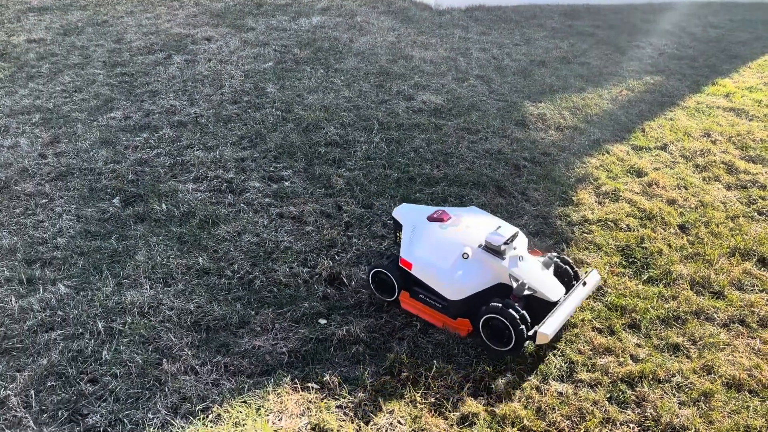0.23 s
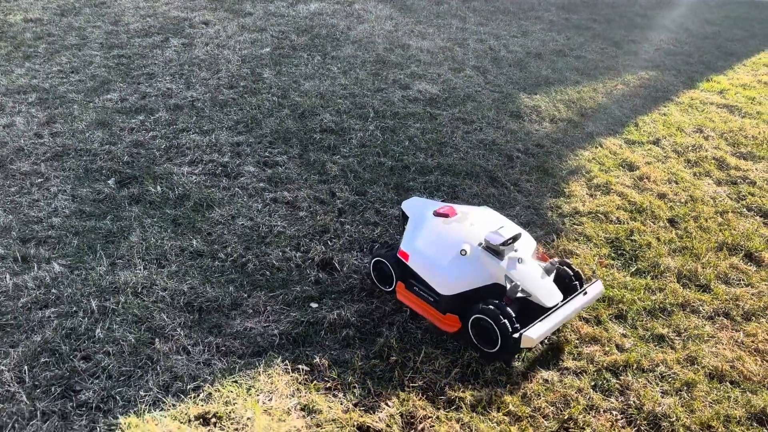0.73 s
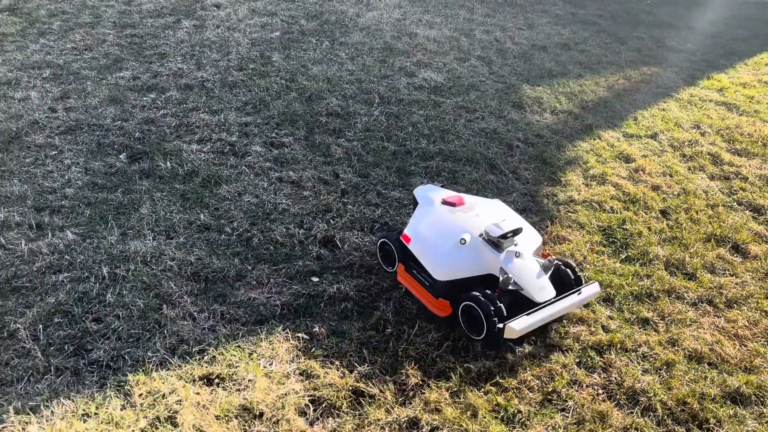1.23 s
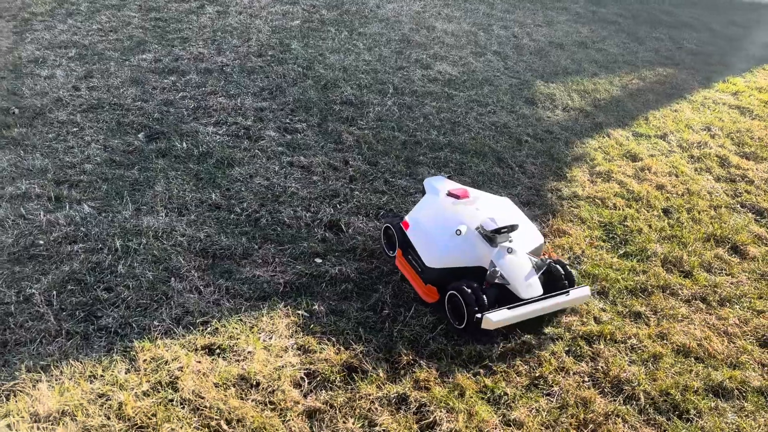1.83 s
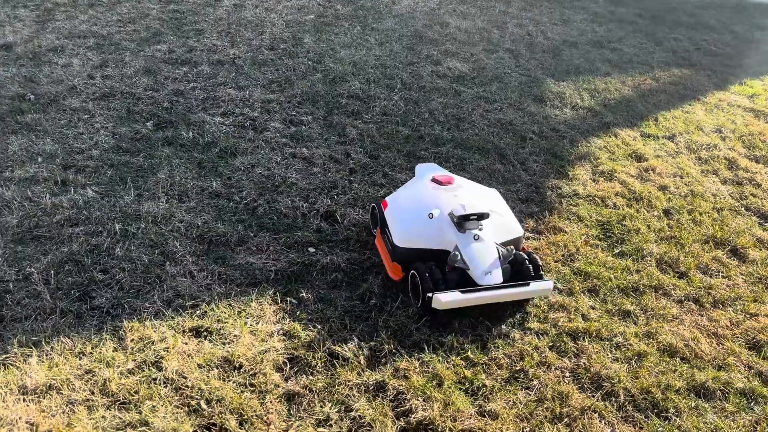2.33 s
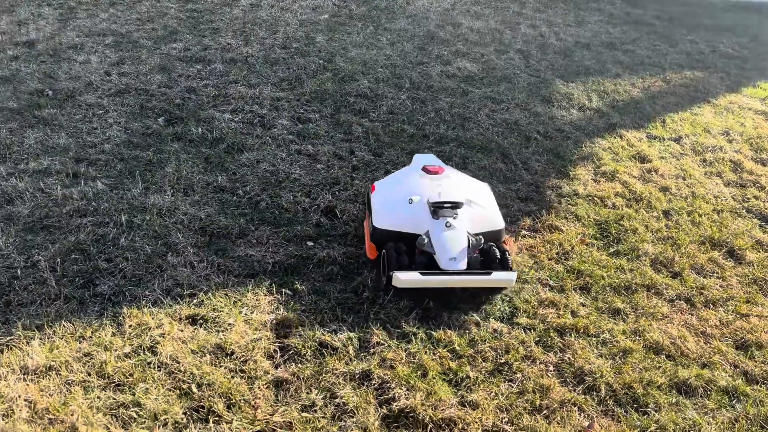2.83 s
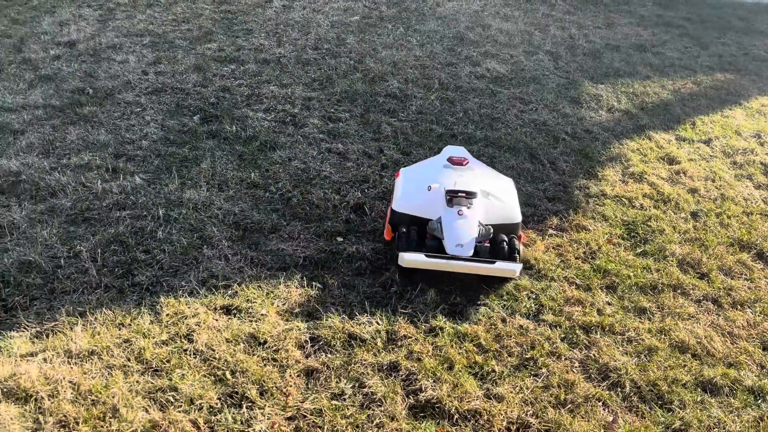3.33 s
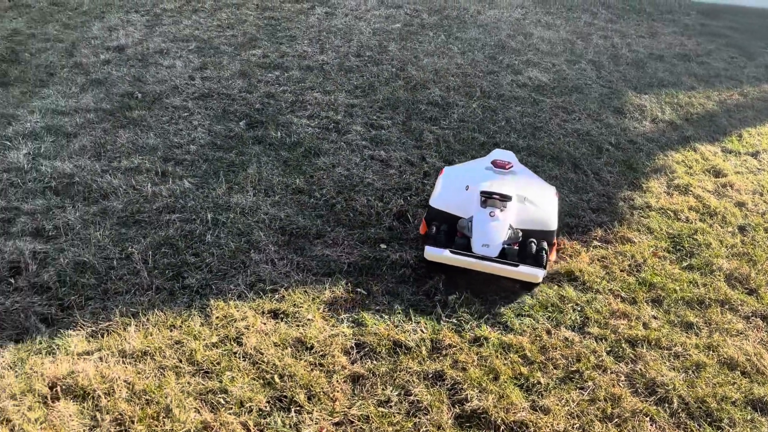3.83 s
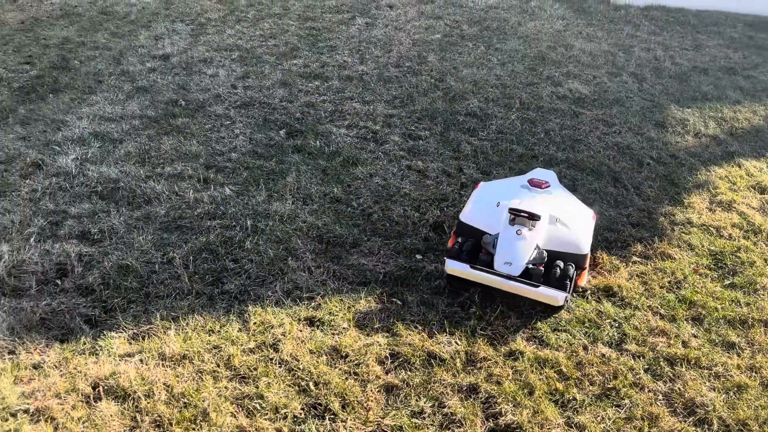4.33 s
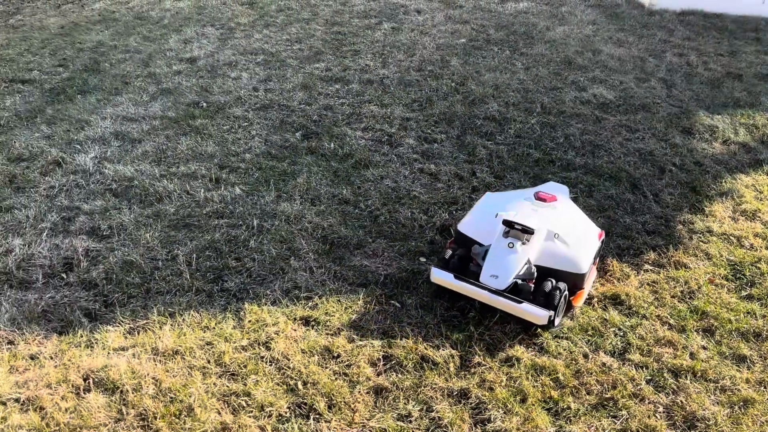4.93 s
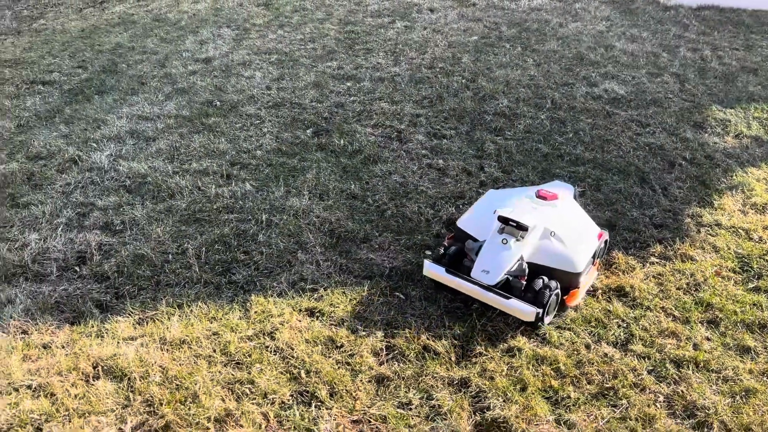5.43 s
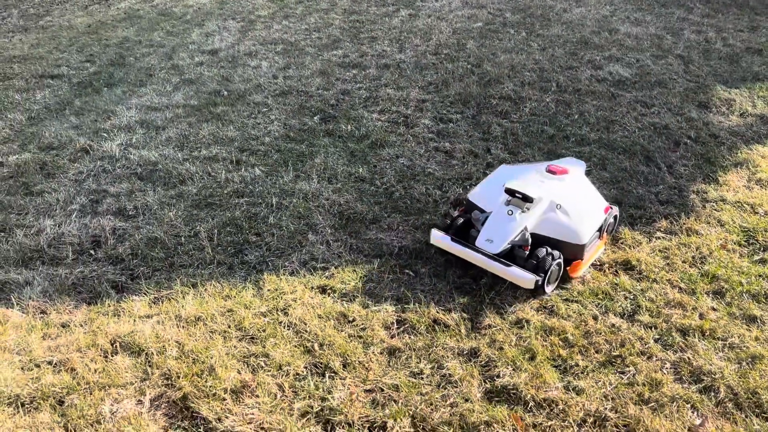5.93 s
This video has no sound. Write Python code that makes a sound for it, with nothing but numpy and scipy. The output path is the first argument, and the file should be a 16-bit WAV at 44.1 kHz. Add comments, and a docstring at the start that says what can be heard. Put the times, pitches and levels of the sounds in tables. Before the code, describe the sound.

A robot mower turns on the spot outdoors, two motors whining with a slow beating waver over airy hiss, grass rustle and wind rumbles.

```python
"""The two blade motors of a robot mower turning on the spot whine a little apart, so the whines beat.
Each motor is a stack of sines on multiples of its shaft angle, swelling and dipping with the heading.
Filtered noise makes the air under the deck, a throbbing hiss and the grass being cut; stems snap as short cracks.
A light wind buffets the two microphone ports of a hand-held phone: low noise and short, sinking wobbles."""
import sys
import numpy as np
from scipy import signal
from scipy.fft import rfft, irfft, next_fast_len
from scipy.io import wavfile
from scipy.ndimage import uniform_filter1d

SR = 44100
rng = np.random.default_rng(int(sys.argv[2]) if len(sys.argv) > 2 else 0)


def log_audio(samples):
    """Write samples as a 16-bit WAV file to the path given in sys.argv[1]."""
    # one column per channel
    frames = np.atleast_2d(samples).T
    # limit to full scale, then quantise
    limited = np.clip(frames, -1, 1)
    pcm = np.round(limited * 32767).astype(np.int16)
    wavfile.write(sys.argv[1], SR, pcm)


N = 272185
PADDED = next_fast_len(N)  # length of the spectra

# the mower turns steadily and faces the phone at this moment
TURN_DEG_PER_S, FACING_S = 18, 3.2
WHINE_ORDER = 31  # the strongest whine, in cycles per shaft turn

# broad sounds as the body turns: (time [s], hiss level [dB], hiss centre [Hz],
# deck air level from 3.3 to 5 kHz [dB], swing of the whine to the left [dB])
TURN = [(0.0, -52, 6500, -64, 2), (0.03, -54, 6430, -63, 2), (0.46, -49, 6380, -61, 1.5),
        (0.79, -53, 6550, -61, 1.5), (1.01, -50, 6400, -60, 0), (1.79, -48.5, 6420, -62, 0),
        (1.97, -45.5, 6720, -60.5, 1), (2.32, -49.5, 6560, -63.5, 0), (2.68, -52, 6400, -62.5, -1.5),
        (2.82, -49, 6360, -62, 1), (3.49, -53.5, 6260, -64, 0.5), (4.07, -53.5, 6300, -63.5, 0.5),
        (4.64, -52.5, 6530, -66.5, -1.5), (4.79, -52.5, 6500, -69, -2.5), (5.7, -53, 6570, -65.5, -2),
        (5.96, -53, 6460, -64.5, -2), (6.17, -49.5, 6400, -63.5, 0.5)]
# colour of cut grass and snapping stems: (frequency [Hz], relative level per Hz [dB])
GRASS_COLOUR = [(4000, -29), (7000, 5.5), (8500, 1), (10000, 1), (12300, 3), (13500, -3), (16000, -11)]


def motors():
    """Two blade motors at slightly different speeds beat; also returns the faster shaft's angle."""
    # pitch of each motor's strongest whine: (time [s], slower motor [Hz], faster motor [Hz])
    whine_hz = [(0.0, 1554.43, 1564.82), (0.343, 1554.23, 1564.9), (0.686, 1554.56, 1566.65),
                (1.028, 1553.97, 1563.05), (1.371, 1553.49, 1562.06), (1.714, 1553.9, 1563.31),
                (2.057, 1554.64, 1563.56), (2.399, 1553.67, 1563.01), (2.742, 1553.16, 1560.58),
                (3.085, 1553.58, 1560.75), (3.428, 1553.72, 1560.4), (3.771, 1554.04, 1562.22),
                (4.113, 1555.06, 1563.81), (4.456, 1555.83, 1566.39), (4.799, 1555.15, 1566.66),
                (5.142, 1554.53, 1565.82), (5.484, 1554.36, 1565.59), (5.827, 1553.76, 1563.76),
                (6.17, 1554.15, 1564.45)]
    # level of the two whines: (time [s], slower motor rms [dB], faster motor rms [dB])
    whine_db = [(0, -58.5, -57), (.5, -58.5, -55.5), (1.2, -52, -57.5), (2.05, -48, -55.5),
                (2.9, -52.5, -49.6), (3.9, -52.7, -52.5), (4.35, -51.5, -53.6), (5.5, -52, -46.9),
                (6.17, -53.3, -47.6)]
    # tones that leave the body at two spots: (shaft order, rms on a swell when facing [dB],
    # rise per 10 degrees [dB], depth of the dips [0-1], heading of a dip [degrees], dip spacing [degrees])
    slow_laws = [(20, -66, -.7, .3, -40, 60), (21, -65, -.5, .5, -3, 70), (28, -71, -.3, .4, 14, 60),
                 (29, -62, -.6, 0, 0, 50), (30, -66, .3, .45, 15, 50), (32, -74, -.4, .5, 5, 70)]
    fast_laws = [(29, -54.6, .1, .3, -20, 70), (21, -55.8, .4, .4, 17, 60), (20, -66.5, 0, .3, -19, 52),
                 (30, -58.8, -.3, .75, 14, 52), (28, -65, -1.37, .3, -11, 38),
                 (63, -74.5, -.31, .3, -13, 34), (32, -73, .9, .2, -19, 40), (39, -70.5, -.3, .55, 7, 48),
                 (40, -75, 0, .6, -8, 48), (48, -76, 0, .7, -35, 70), (22, -69, 0, .6, 12, 50),
                 (53, -81, -1.4, .3, 0, 60)]
    # thin overtones that beam out at some angles: (shaft order, shaft order)
    beam_orders = (50, 60)
    # their levels on the slower motor: (time [s], first order rms [dB], second order rms [dB])
    beam_levels = [(0, -68.5, -84), (.75, -69.5, -78), (1.05, -78, -69.5), (1.45, -81, -67.5),
                   (1.8, -82, -70), (2.05, -82, -78), (2.25, -82, -64.5), (2.75, -83, -68),
                   (3.05, -83, -84), (3.9, -84, -75), (4.45, -84, -81), (4.75, -77, -88), (6.17, -85, -80)]
    # the same overtones on the faster motor re the slower: (first order [dB], second order [dB])
    fast_beam_db = (-1.5, -3.5)
    cancel_s = 3.38  # the whines are in antiphase here, bar the shaft sway
    sway_rad = 0.003  # each shaft runs a little ahead and behind as the blades meet grass

    slow, fast = (np.cumsum(hz) * 2 * np.pi / SR for hz in curves(whine_hz))
    fast += np.pi - (fast - slow)[int(cancel_s * SR)]
    slow = slow / WHINE_ORDER + sway_rad * walk(4)
    fast = fast / WHINE_ORDER + sway_rad * walk(4)

    slow_db, fast_db = curves(whine_db)
    beams = [(order, db + 0.8 * walk(6)) for order, db in zip(beam_orders, curves(beam_levels))]
    slow_tones = [(order, lobes(*law)) for order, *law in slow_laws]
    slow_tones += [(WHINE_ORDER, slow_db)] + beams
    fast_tones = [(order, lobes(*law)) for order, *law in fast_laws]
    fast_tones += [(WHINE_ORDER, fast_db)]
    fast_tones += [(order, db + offset_db) for (order, db), offset_db in zip(beams, fast_beam_db)]
    return motor(slow, slow_tones, -3) + motor(fast, fast_tones, 0), fast


def motor(angle, tones, comb_db):
    """Sines on multiples of the shaft angle; each flutters a little, the faint ones come and go and fade."""
    # fainter tones that both motors have: (shaft order, ..)
    faint_orders = (6, 10, 11, 12, 18)
    # their levels before the fade: (rms [dB], ..)
    faint_levels = (-73, -71.5, -74, -71.5, -70)
    fade_db = np.linspace(0, -7, N)
    faint = [(order, db + fade_db + 3 * walk(2.5)) for order, db in zip(faint_orders, faint_levels)]
    out = 0
    for order, db in tones + faint:
        # both whines start from a set phase, so their beat falls where it should
        start = 0 if order == WHINE_ORDER else rng.uniform(0, 2 * np.pi)
        flutter_db = 0.35 * walk(9)
        out = out + np.sqrt(2) * undb(db + flutter_db) * np.sin(order * angle + start)
    taken = [order for order, _ in tones + faint]
    return out + comb(angle, taken, comb_db)


def comb(angle, taken, db):
    """One shaft turn of weak orders, repeated; groups of orders swell and sink on their own."""
    # outline of the comb, joined by straight lines: (shaft order, middle rms before the motor's offset [dB])
    outline = [(13, -80), (17, -77), (24, -75), (28, -76), (34, -81), (40, -80.5), (48, -83.5), (62, -87.5)]
    groups, scatter_db = 5, 2
    orders = np.arange(outline[0][0], outline[-1][0] + 1)
    scatter = scatter_db * rng.standard_normal(len(orders))
    start = 2 * np.pi * rng.random(len(orders))
    gains = np.sqrt(2) * undb(db + np.interp(orders, *np.transpose(outline)) + scatter)
    gains = gains * ~np.isin(orders, taken)
    turn = np.linspace(0, 2 * np.pi, 4096)
    waves = gains[:, None] * np.sin(orders[:, None] * turn + start[:, None])
    out = 0
    for k in range(groups):
        one_turn = waves[k::groups].sum(axis=0)
        out = out + undb(3.5 * walk(3)) * np.interp(angle % (2 * np.pi), turn, one_turn)
    return out


def lobes(db, rise_db, depth, dip_deg, apart_deg):
    """Level in dB of two radiating spots that interfere as the heading changes."""
    heading = TURN_DEG_PER_S * (np.arange(N) / SR - FACING_S)
    pair = 1 + depth ** 2 - 2 * depth * np.cos(2 * np.pi * (heading - dip_deg) / apart_deg)
    return db + rise_db * heading / 10 + 10 * np.log10(pair / (1 + depth) ** 2)


def rush(shaft):
    """Everything airy from the mower: deck air, hollow, hiss and cut grass; tufts lift deck air and grass."""
    tuft_db = tufts()
    return deck_air(tuft_db) + hollow() + hiss(shaft) + cut_grass(tuft_db)


def tufts():
    """Rise in dB as the deck brushes thicker tufts."""
    # (time of the middle [s], rise [dB], length at half height [ms])
    brushes = [(.15, 3, 36), (.76, 4, 89), (.93, 3.5, 150), (1.4, 1.5, 240), (1.85, 3.5, 100),
               (2.17, 4, 30), (2.48, 6, 190), (2.65, 4.5, 91), (4.4, 5, 98), (4.92, 2.5, 190),
               (5.22, 3.5, 57)]
    t = np.arange(N) / SR
    return sum(db * hump(t - s, ms) for s, db, ms in brushes)


def deck_air(tuft_db):
    """Broadband air under the deck; its bass, body and treble change apart as the mower turns."""
    # colour of the air: (frequency [Hz], relative level per Hz [dB])
    air_colour = [(200, -7), (300, -3), (430, -9.5), (570, -4.5), (650, -8), (760, -4.5), (900, -3),
                  (1050, -7.5), (1160, -9.5), (1270, 0.5), (1450, 1.5), (1750, -6), (2200, -13.5),
                  (2600, -16), (2950, -15), (3300, -18), (4800, -19.5), (8000, -30)]
    # bass re the rest: (level on a swell when facing [dB], rise per 10 degrees [dB], depth of the dips [0-1],
    # heading of a dip [degrees], dip spacing [degrees])
    bass_law = (-0.5, 0.03, 0.05, -14, 91)
    # edges of the bands that swell and sink on their own: (frequency [Hz], ..)
    patch_edges = (1750, 2150, 2650, 3250, 4000, 4600, 5300)
    facing_db, rise_db_per_10_deg = -50, -0.19
    patch_db = 1.5
    tuft_share = 0.49  # share of a tuft's rise that also lifts the upper deck air

    air = unit(colour(rng.standard_normal(N), air_colour))
    treble = signal.sosfilt(signal.butter(2, 2600, "high", fs=SR, output="sos"), air)
    bass = signal.sosfilt(signal.butter(2, 800, fs=SR, output="sos"), air)
    heading = TURN_DEG_PER_S * (np.arange(N) / SR - FACING_S)
    bass_gain = undb(lobes(*bass_law) + 0.67 * walk(4.27))
    body = air - treble + (bass_gain - 1) * bass
    deck = undb(facing_db + rise_db_per_10_deg * heading / 10) * body
    # the treble escapes from another side of the deck, so the colour changes as it turns
    treble_db = curves(TURN)[2]
    deck += undb(treble_db) * treble / np.std(band(treble, 3300, 5000))
    for lo, hi in zip(patch_edges, patch_edges[1:]):
        gain = undb(patch_db * walk(5) + tuft_share * tuft_db)
        deck = deck + (gain - 1) * band(deck, lo, hi)
    return deck


def hollow():
    """Noise ringing in the hollow of the deck, swelling and dipping with the heading."""
    # (rms on a swell when facing [dB], rise per 10 degrees [dB], depth of the dips [0-1],
    # heading of a dip [degrees], dip spacing [degrees])
    law = (-54, -0.25, .2, 11.5, 71)
    # band of the ringing: (from [Hz], to [Hz])
    ring_hz = (970, 1115)
    ring = unit(band(rng.standard_normal(N), *ring_hz))
    return undb(lobes(*law) + 1.1 * walk(10)) * ring


def hiss(shaft):
    """Bands of noise that throb six times a shaft turn, strongest near a wandering centre."""
    # (from [Hz], to [Hz])
    bands = [(5250, 5650), (5850, 6300), (6300, 6800), (6850, 7250)]
    fall_db = 4  # at 500 Hz off the centre, growing with the square of the distance
    hiss_db, centre_hz = curves(TURN)[:2]
    throb = 1 + 0.098 * np.sin(6 * shaft)
    share = np.array([undb(-fall_db * (((lo + hi) / 2 - centre_hz) / 500) ** 2) for lo, hi in bands])
    # together the bands carry the level of the hiss
    share *= undb(hiss_db) / np.sqrt(np.sum(share ** 2, axis=0))
    out = 0
    for gain, (lo, hi) in zip(share, bands):
        noise = unit(band(throb * rng.standard_normal(N), lo, hi))
        out = out + gain * undb(1.5 * walk(6)) * noise
    return out


def cut_grass(tuft_db):
    """Grainy noise of grass being cut and brushed; the louder it gets, the more its top above 9.6 kHz rises."""
    # steady cutting: (time [s], level [dB])
    cutting = [(0, -57.5), (2.7, -58), (2.85, -61), (4.4, -59.5), (6.17, -59)]
    # sparse samples jump up, and the whole wavers
    jumps_db = 2.2 * rng.exponential(size=N) * (rng.random(N) < 0.02)
    grains = undb(jumps_db + 1.2 * walk(12))
    grass = unit(colour(grains * rng.standard_normal(N), GRASS_COLOUR))
    rustle_db = curves(cutting)[0] + tuft_db
    top_db = 0.56 * (rustle_db + 58)
    grass += (undb(top_db) - 1) * band(grass, 9600, 21000)
    return undb(rustle_db) * grass


def snaps():
    """Snapping stems: short decaying cracks of noise with the colour of the grass."""
    # (time [s], starting level before colouring [dB])
    stems = [(0.2967, -51), (1.1827, -45), (1.8502, -45), (2.164, -45), (2.2304, -39), (2.2987, -44),
             (2.6194, -49), (4.9212, -43), (5.0669, -48)]
    out, t = np.zeros(N), np.arange(600) / SR
    cracks = rng.standard_normal((len(stems), len(t))) * np.exp(-t / 0.003)
    for (s, db), crack in zip(stems, cracks):
        out[int(s * SR):][:len(t)] += undb(db) * crack
    return colour(out, GRASS_COLOUR)


def wind():
    """Low rumble at the ports with short pressure wobbles; mostly alike left and right."""
    # buffets: (time of the middle [s], peak level [dB], pitch at the middle [Hz], length at half height [ms])
    buffets = [(0.678, -41, 87, 8.1), (1.37, -50, 60, 25), (1.678, -40.5, 92, 12), (1.805, -45, 64.6, 18),
               (2.952, -44, 70, 11), (2.974, -42, 57, 16), (3.015, -37, 68, 11), (3.053, -33, 78.6, 15),
               (3.083, -34, 63, 15), (3.088, -42.5, 210, 7), (3.112, -37, 75, 23), (3.152, -33.5, 58, 33),
               (3.219, -39, 58, 16), (3.282, -44, 75.4, 27), (3.351, -36, 68.5, 18), (3.53, -38, 58, 21),
               (3.635, -35, 55, 17), (3.588, -44, 80, 20), (3.671, -41.5, 95, 11), (3.694, -41, 96, 9.5),
               (3.727, -46, 80, 16), (3.781, -37.5, 70, 43), (3.83, -46, 80, 14), (3.861, -42, 110, 15),
               (3.893, -41, 74.6, 23), (3.969, -47, 75, 16), (4.019, -42.5, 86, 14), (4.091, -35.5, 60, 33),
               (4.133, -30.5, 78, 13), (4.158, -40.5, 235, 9.1), (4.173, -23.5, 68, 24),
               (4.216, -36, 62, 9.8), (4.258, -40, 93, 10), (4.279, -33, 90, 14), (4.3, -25, 70, 21),
               (4.357, -34.5, 60.5, 31), (4.403, -41, 91, 20), (4.431, -49, 90, 11), (4.459, -46, 120, 18),
               (4.497, -40, 70, 46), (4.544, -38, 80, 16), (4.575, -37, 66, 36), (4.605, -37, 118, 4),
               (4.655, -40, 60, 17), (4.724, -48, 90, 16), (4.849, -44, 165, 8.1), (4.868, -37, 121, 5.3),
               (4.89, -45, 55, 24), (4.92, -48, 90, 28), (5.352, -46, 70, 18), (5.465, -48, 58, 42),
               (5.751, -54, 75, 16), (6.024, -49, 70, 48)]
    mid = breeze()
    side = undb(-5.5) * breeze()  # the steady rumble is nearly the same at both ports
    t = np.arange(-4000, 4000) / SR
    chance = rng.random((len(buffets), 2))
    turbulence = unit(band(rng.standard_normal(N), 90, 152))
    for (s, db, hz, ms), (start, lean) in zip(buffets, chance):
        # each wobble sinks in pitch as the eddy passes
        angle = 2 * np.pi * (hz * t * (1 - 2 * t) + start)
        wobble = undb(db) * hump(t, ms) * np.cos(angle)
        i = int(s * SR) - len(t) // 2
        # finer turbulence rides on its leading edge
        wobble += undb(db - 15.5) * hump(t + 0.012, ms) * turbulence[i:i + len(t)]
        mid[i:i + len(t)] += wobble
        # a delayed copy leans to a random side
        side[i:i + len(t)] += np.roll(wobble, 150) * (2 * lean - 1)
    return mid + undb(-7.5) * side * np.array([[1], [-1]])


def breeze():
    """Steady wind rumble: deep noise and an upper part that waver apart."""
    # (time [s], deep level [dB], upper level [dB])
    levels = [(0, -67, -63), (.3, -53.5, -58), (.6, -55.5, -62), (.91, -61, -62.5), (1.79, -56.5, -58.5),
              (2.06, -63.5, -63), (2.8, -55.5, -57), (3.05, -54.5, -63), (3.37, -53.5, -63),
              (3.9, -53, -58), (4.3, -50, -61), (4.5, -50, -58), (4.65, -54.5, -61.5), (5.16, -66, -69),
              (5.7, -79, -59), (6.17, -57, -63)]
    # colour of the deep part: (frequency [Hz], relative level per Hz [dB])
    rumble_colour = [(18, -42), (30, -23), (55, 0.5), (80, -5.5), (130, -11.5), (220, -53), (450, -40),
                     (1500, -84)]
    deep_db, upper_db = curves(levels)
    deep = unit(colour(rng.standard_normal(N), rumble_colour))
    upper = unit(band(rng.standard_normal(N), 88, 204))
    return deep * undb(deep_db + 2.0 * walk(12)) + upper * undb(upper_db + 3.2 * walk(12))


def undb(db):
    """dB to gain."""
    return 10 ** (np.asarray(db) / 20)


def unit(x):
    """Scaled to rms 1."""
    return x / np.sqrt(np.mean(x ** 2))


def hump(t, ms):
    """Bell of height 1 around t = 0, ms long at half height."""
    return np.exp(-np.log(16) * (1000 * t / ms) ** 2)


def walk(rate):
    """Random levels held 1 / rate s and slewed twice; spread 1."""
    k = int(SR / rate)
    steps = np.repeat(rng.standard_normal(N // k + 1), k)
    return unit(uniform_filter1d(uniform_filter1d(steps, k), k)[:N])


def curves(table):
    """Every column of a table of (time [s], value, ..) rows, sample by sample."""
    s, *columns = np.transpose(table)
    return [np.interp(np.arange(N) / SR, s, c) for c in columns]


def over_hz(table):
    """Every column of a table of (frequency [Hz], value, ..) rows, bin by bin on a log scale."""
    hz, *columns = np.transpose(table)
    bins = np.log(np.arange(1, PADDED // 2 + 2) * SR / PADDED)
    return [np.interp(bins, np.log(hz), c) for c in columns]


def colour(x, spectrum):
    """A sound filtered by a curve of (frequency [Hz], gain [dB]) points."""
    return irfft(rfft(x, PADDED) * undb(over_hz(spectrum)[0]), PADDED)[:N]


def band(x, lo_hz, hi_hz):
    """Butterworth band-pass."""
    return signal.sosfilt(signal.butter(2, [lo_hz, hi_hz], "band", fs=SR, output="sos"), x)


def scene():
    """Each port hears the mower with its own phase and level; a part of the noise differs between them."""
    # (frequency [Hz], left minus right [dB], share of the noise that is alike [0-1],
    # left minus right after the swing [dB], share alike after the swing [0-1])
    port_table = [(100, -1.5, 1, -1.5, 1), (307, 1.5, 0.23, 1.5, .23), (606, -1, 0.4, -1, .4),
                  (1310, -3, 0.85, -2.5, .85), (2070, -2.5, 0.75, -2, .5), (2650, -1.5, .6, 0, .45),
                  (2950, 1.5, 0.55, 2.5, .45), (3300, .5, .75, 2.5, .3), (4270, 0, .95, 1.5, .4),
                  (4950, -1, 0.4, 1.5, .03), (5950, -2.5, 0.6, -2.5, .08), (6450, -1, .55, -1, .15),
                  (6900, 1, 0.09, -1, .15), (7250, 0, 0.2, -2, .3), (7900, 0, .95, -.5, .95),
                  (12000, 0, .96, 0, .96), (13500, 0, .6, 0, .6), (15900, 0, 0.8, 0, .8)]
    # (frequency [Hz], lead of the right port [rad], lead after the swing [rad])
    lead_table = [(100, 0, 0), (400, .1, .2), (1050, .35, .9), (1300, .5, 1), (1500, .72, 1.25),
                  (1750, .7, 1.3), (2050, 0, .6), (2350, -.1, .2), (2900, -.4, -.2), (3300, -.1, .2),
                  (4500, 0, .1), (5300, 1, 1), (5950, 1.2, 1.9), (6500, 1.5, 3.3), (7300, 5, 4.8),
                  (8400, 6.28, 6.28), (9600, 6.28, 6.28), (11200, 9.42, 9.42), (13000, 9.42, 9.42),
                  (14500, 12.57, 12.57)]
    # the phone swings round: (from [s], to [s])
    swing_s = (4.34, 4.6)
    tones, shaft = motors()
    common = rfft(tones + snaps(), PADDED)
    shared, other = rfft(rush(shaft), PADDED), rfft(rush(shaft), PADDED)

    def heard(lead, pan_db, alike):
        """Both ports for one way of holding the phone."""
        alike = np.clip(alike, 0, 1)
        right_noise = np.sqrt(alike) * shared + np.sqrt(1 - alike) * other
        left = (common + shared) * undb(pan_db / 2)
        right = (common + right_noise) * undb(-pan_db / 2) * np.exp(1j * lead)
        return irfft(np.array([left, right]), PADDED)[:, :N]

    leads, columns = over_hz(lead_table), over_hz(port_table)
    swung = np.interp(np.arange(N) / SR, swing_s, (0, 1))
    before, after = heard(leads[0], *columns[:2]), heard(leads[1], *columns[2:])
    ports = (1 - swung) * before + swung * after
    # the hand also sways a little, which shifts the band around the whine from side to side
    pan_db = curves(TURN)[-1]
    sway = undb(np.array([[1], [-1]]) * pan_db / 2) - 1
    return ports + sway * band(ports, 890, 2040) + wind()


def record(dry):
    """The deepest bass is cut away, and the phone cuts the top."""
    dry = signal.sosfilt(signal.butter(2, 33, "high", fs=SR, output="sos"), dry)
    return signal.sosfilt(signal.ellip(12, 0.3, 70, 15750, fs=SR, output="sos"), dry)


dry = scene()
out = record(dry)
log_audio(out)
```